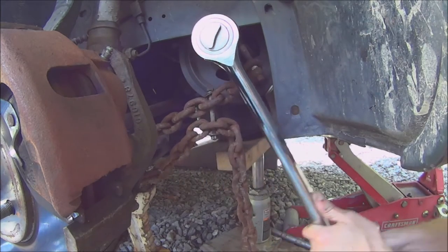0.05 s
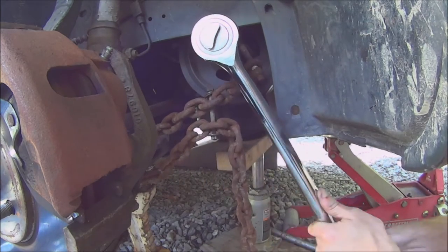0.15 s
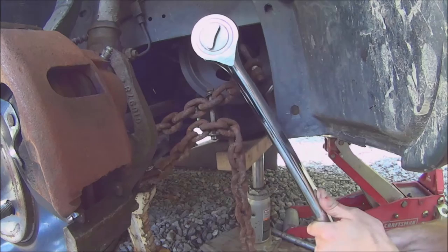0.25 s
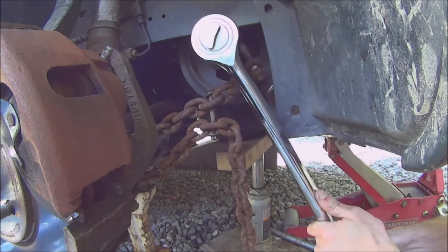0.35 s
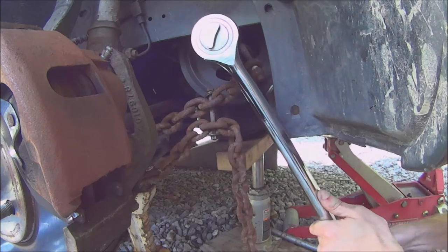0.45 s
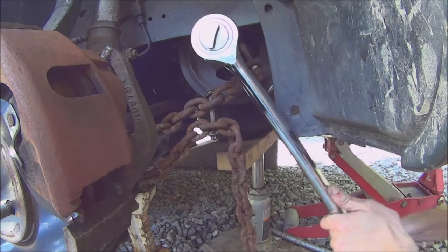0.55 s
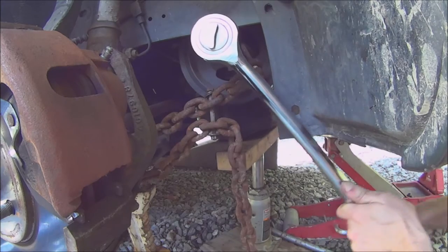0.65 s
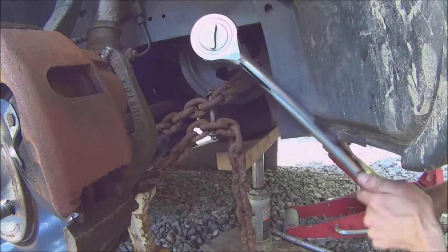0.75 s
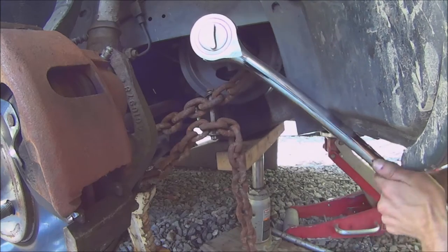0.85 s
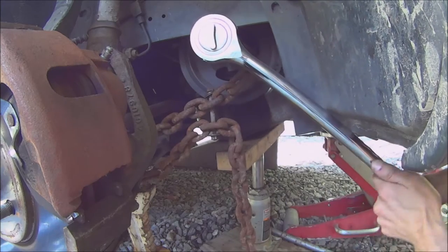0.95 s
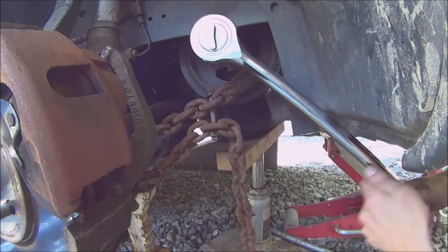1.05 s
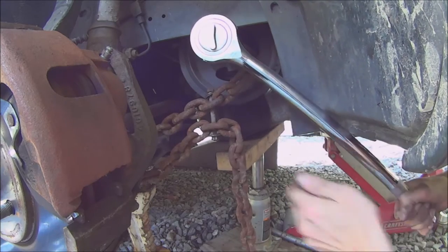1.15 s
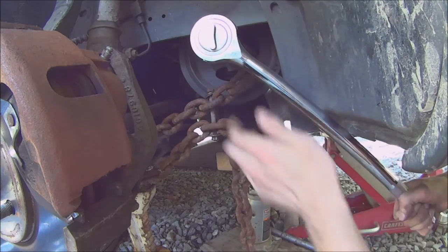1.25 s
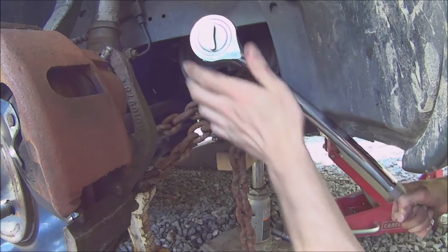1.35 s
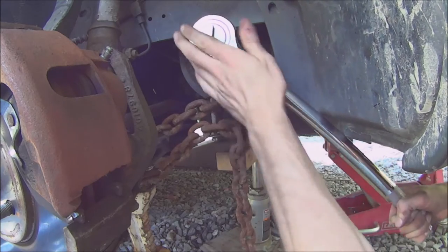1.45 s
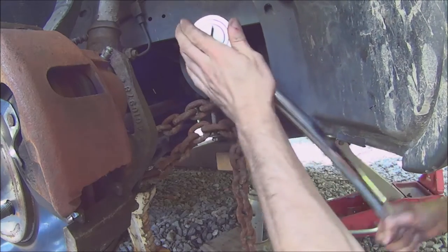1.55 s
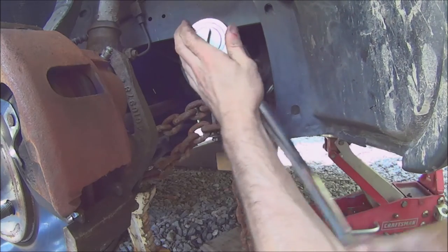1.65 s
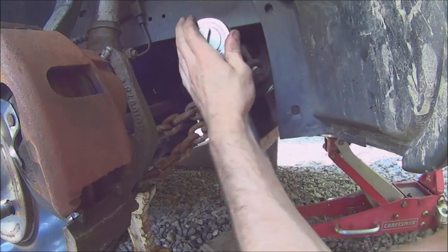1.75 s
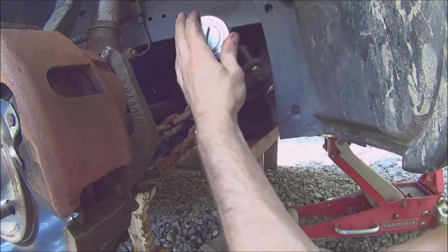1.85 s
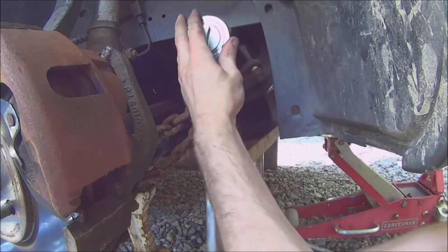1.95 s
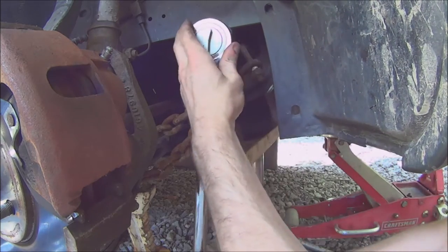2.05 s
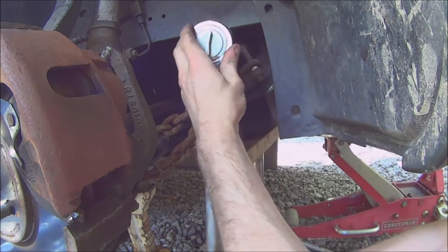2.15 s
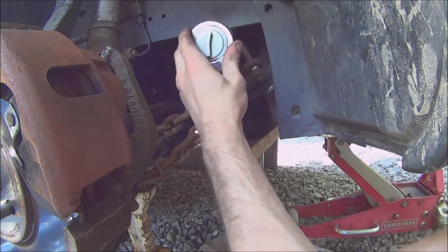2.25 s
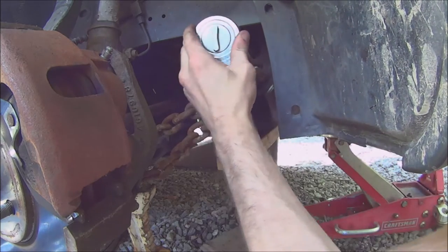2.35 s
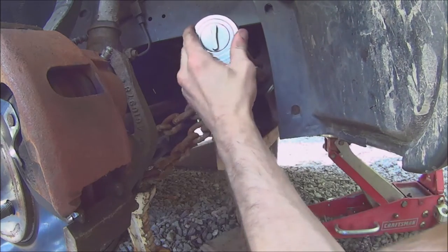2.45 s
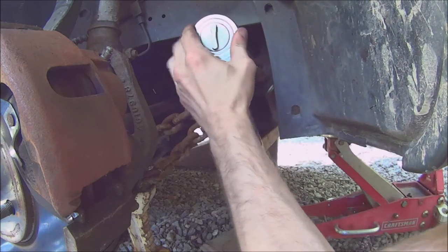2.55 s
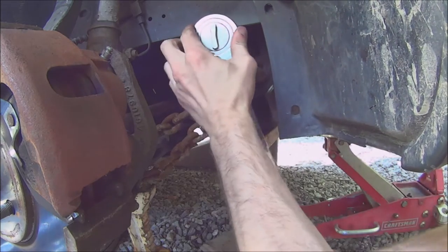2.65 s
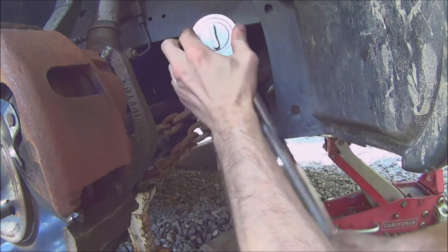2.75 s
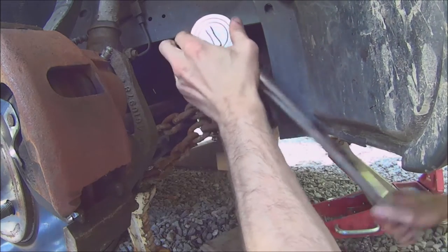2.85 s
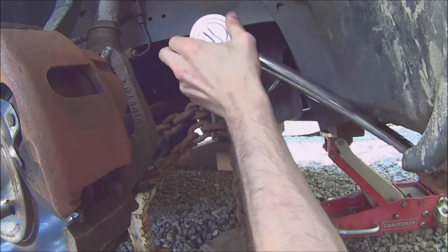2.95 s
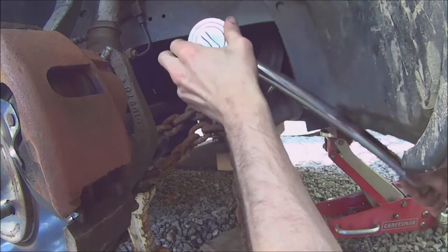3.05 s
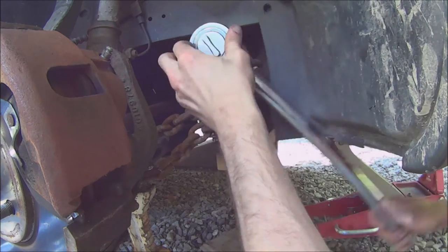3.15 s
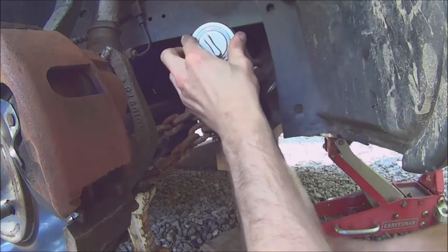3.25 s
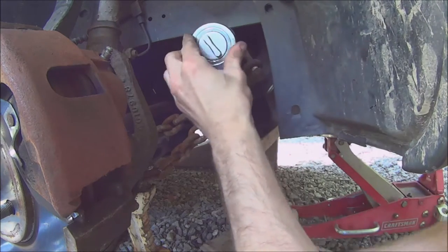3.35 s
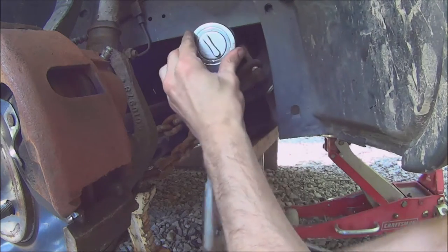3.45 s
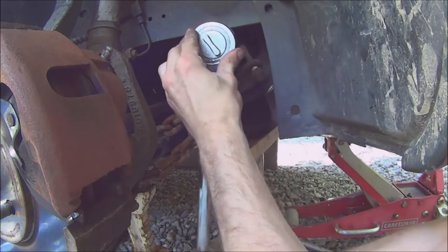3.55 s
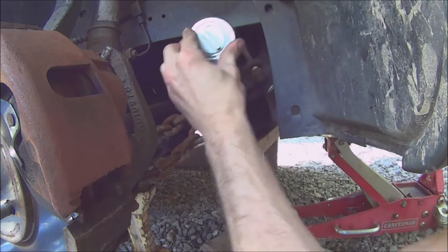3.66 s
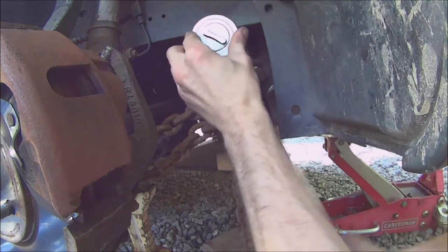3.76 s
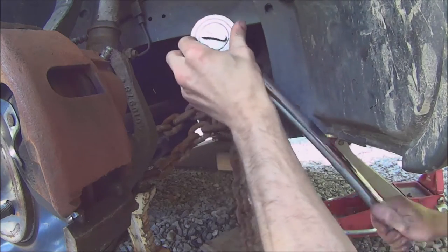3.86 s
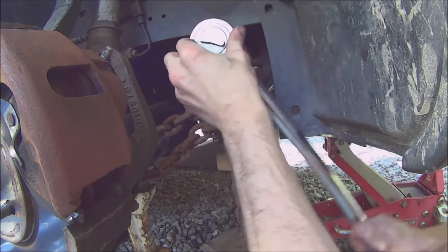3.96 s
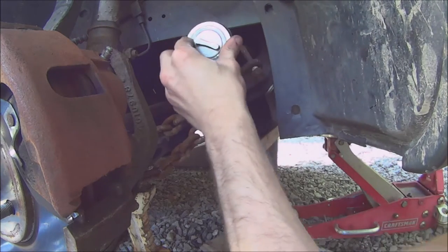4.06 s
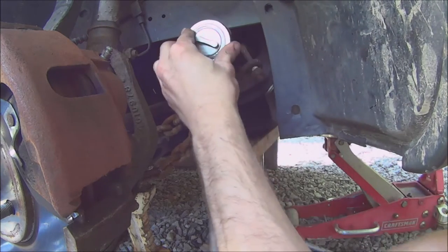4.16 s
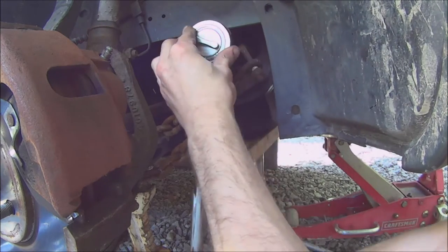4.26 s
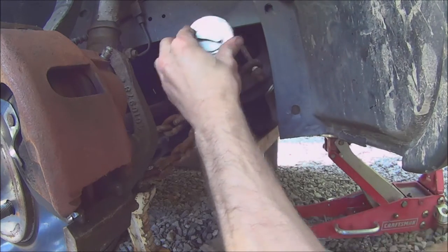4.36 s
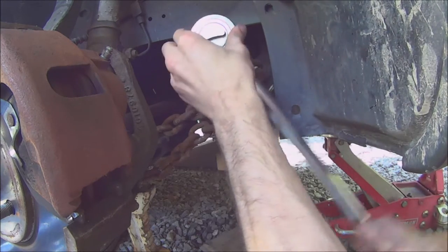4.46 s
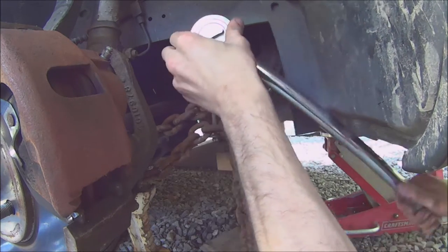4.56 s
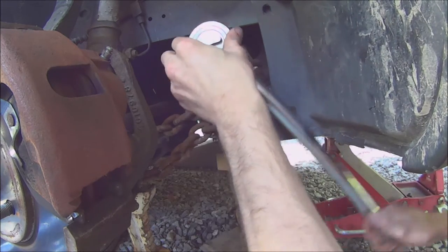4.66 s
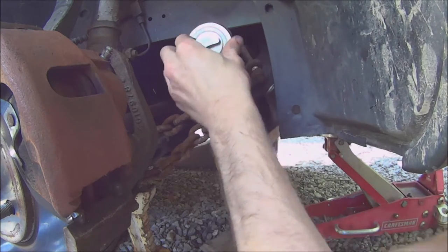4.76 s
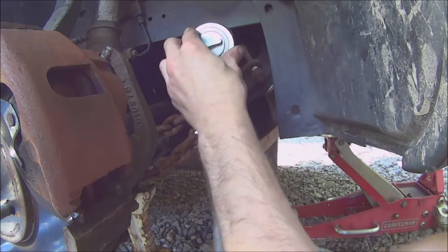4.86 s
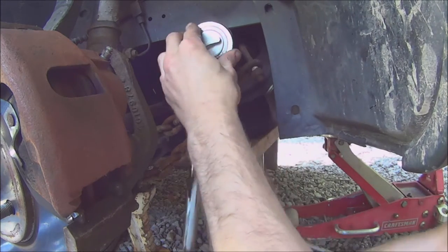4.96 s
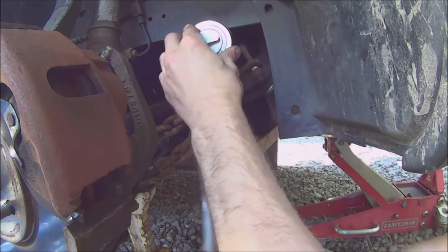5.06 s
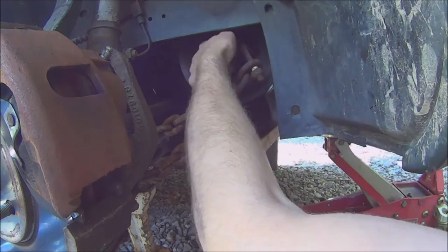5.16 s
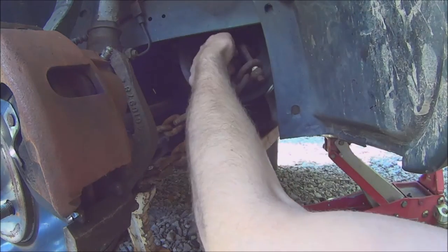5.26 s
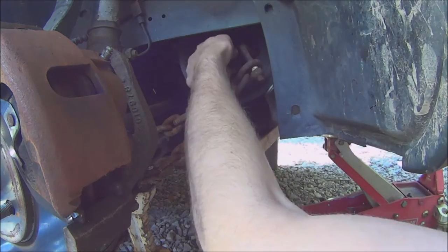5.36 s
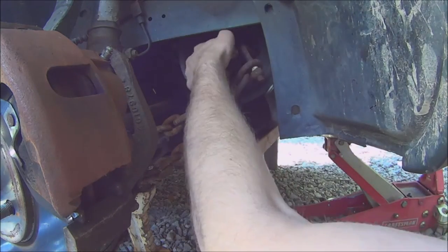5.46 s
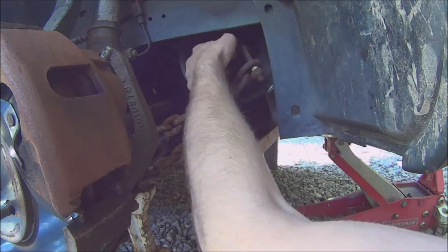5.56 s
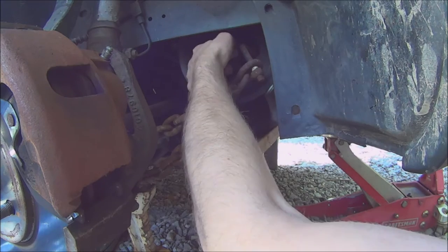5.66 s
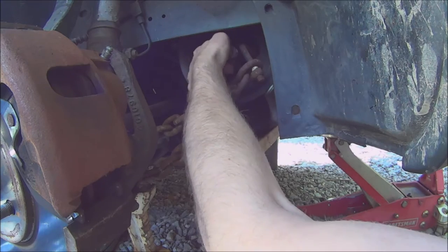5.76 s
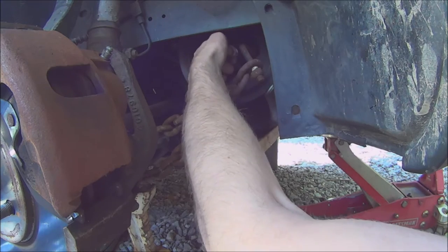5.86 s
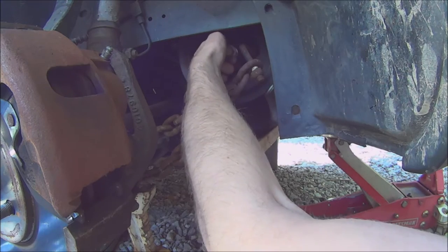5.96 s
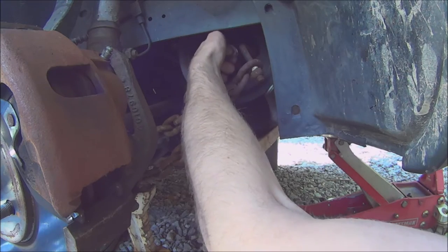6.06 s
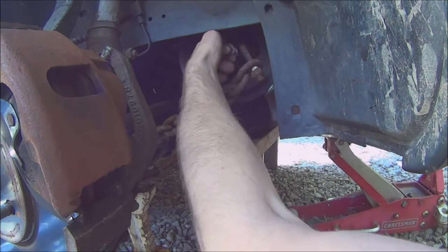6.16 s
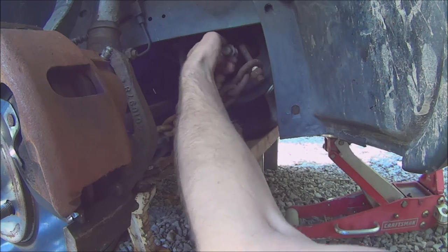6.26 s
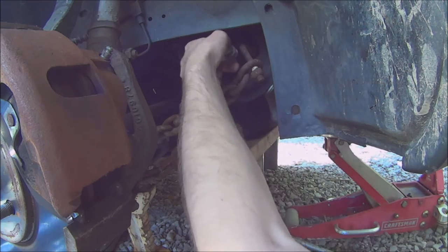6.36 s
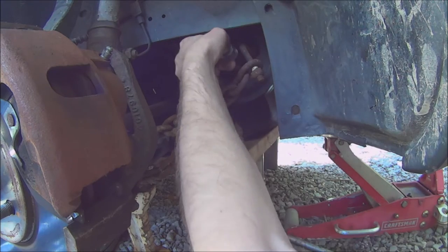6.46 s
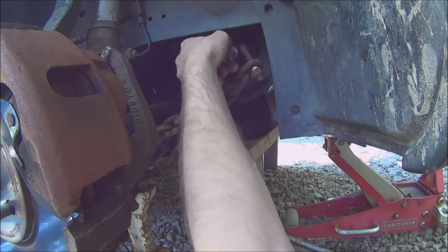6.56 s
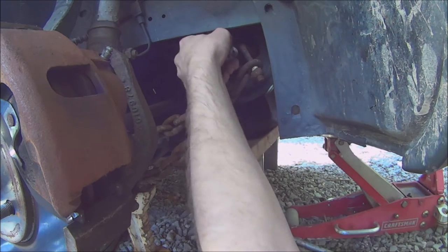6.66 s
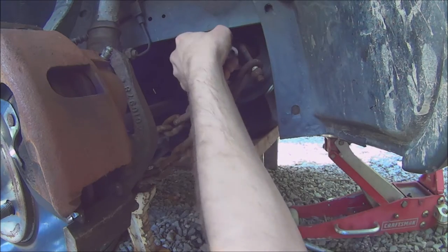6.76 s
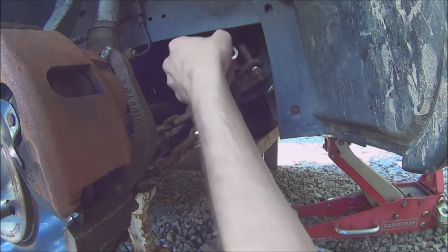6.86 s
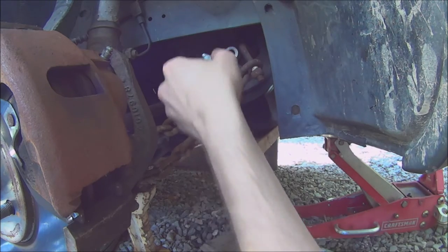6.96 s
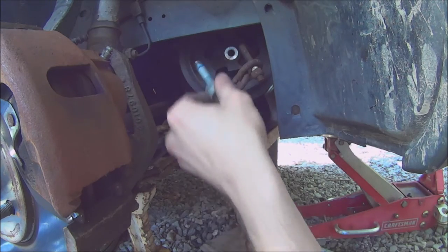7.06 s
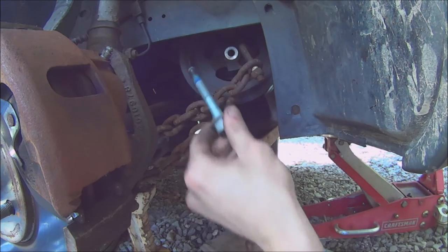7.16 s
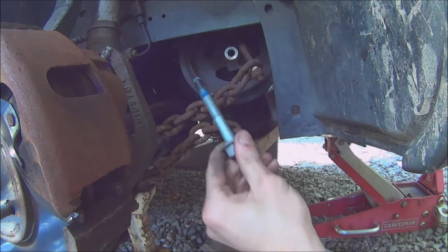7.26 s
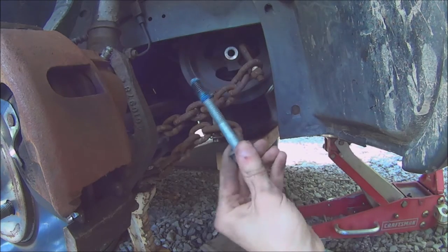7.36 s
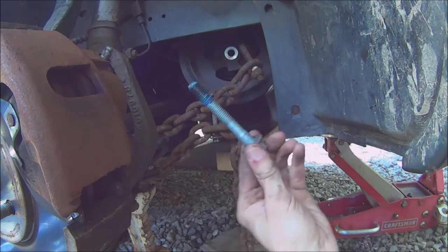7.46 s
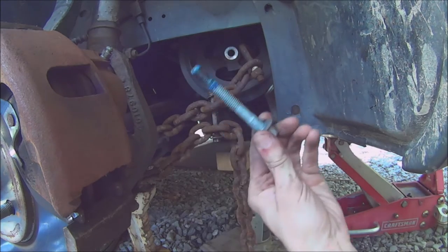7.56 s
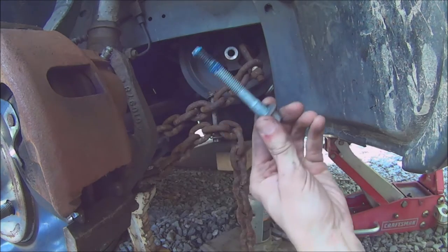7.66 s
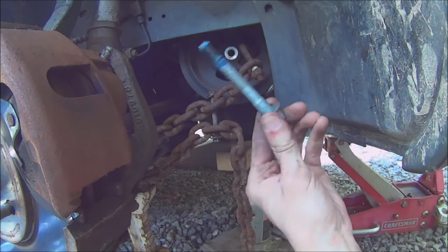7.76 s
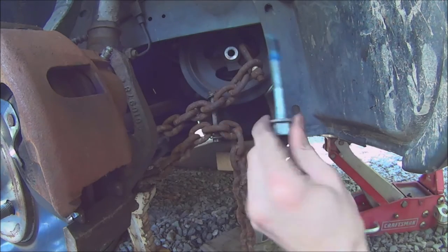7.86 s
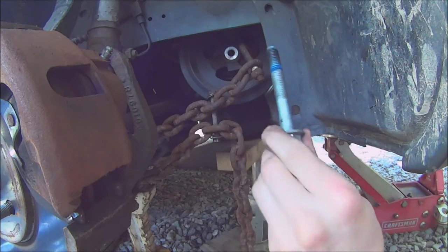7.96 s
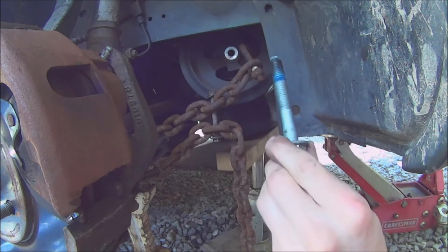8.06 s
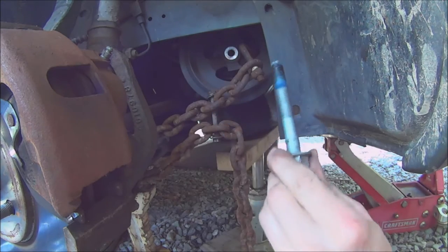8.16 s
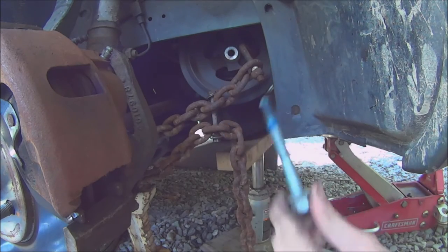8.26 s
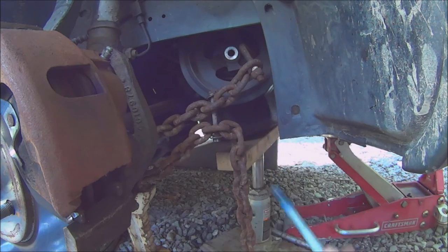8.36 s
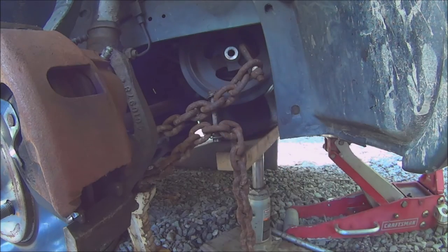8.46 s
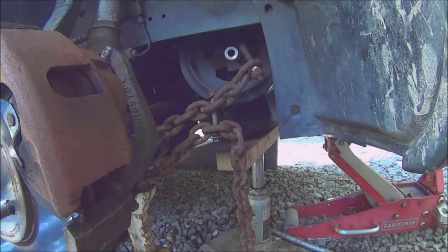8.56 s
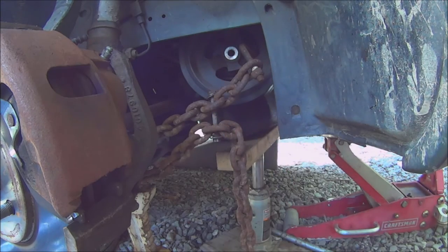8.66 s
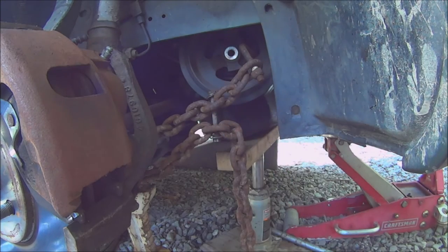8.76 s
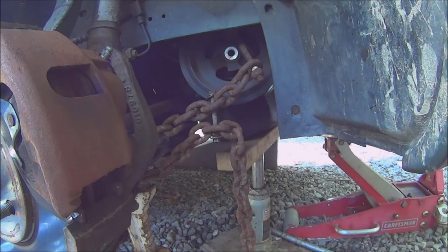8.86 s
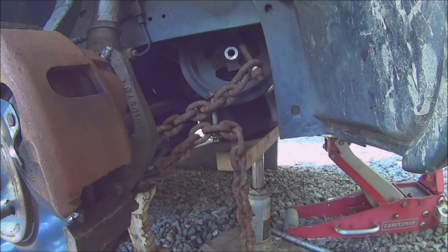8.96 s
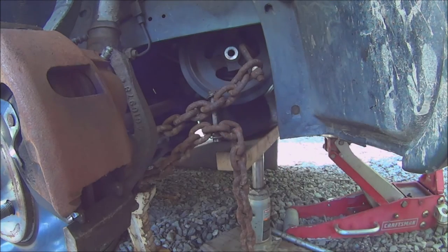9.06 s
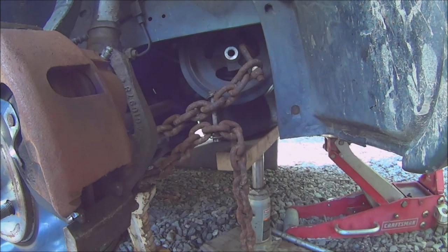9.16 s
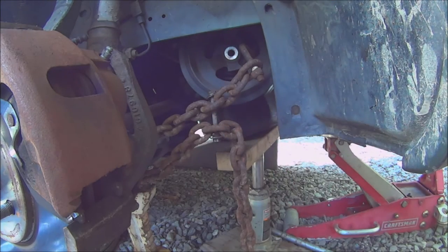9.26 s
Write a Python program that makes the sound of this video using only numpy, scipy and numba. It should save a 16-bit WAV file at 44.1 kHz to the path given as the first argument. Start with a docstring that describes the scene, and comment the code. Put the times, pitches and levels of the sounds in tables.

```python
"""Outdoors, inside a car's wheel well: a big steel ratchet works a bolt loose over a distant motor's hum. The
socket clanks on, the handle clunks under load and thuds the panels, and the pawl clinks from tooth to tooth on
each back swing, over a throbbing hum. Then the scene changes. The long bolt is drawn out by hand, its thread
scraping and its shank ringing, and put aside on gravel while birds whistle in the distance. Near the end the
level dips briefly, and a thin hiss follows."""
import sys
import numpy as np
from scipy import signal
from scipy.fft import rfft, irfft
from scipy.io import wavfile
from scipy.ndimage import uniform_filter1d, minimum_filter1d
from numba import njit

SR = 44100
rng = np.random.default_rng(int(sys.argv[2]) if len(sys.argv) > 2 else 0)


def int16_out(signal):
    """Quantize to a 16-bit WAV file."""
    q = np.round(np.clip(np.atleast_2d(signal).T, -1, 1) * 32767)
    wavfile.write(sys.argv[1], SR, q.astype(np.int16))


N = 410571
TIME = np.arange(N) / SR
HIT = np.arange(SR // 2) / SR  # time since a blow
HUM_END_S, DIP_START_S, DIP_END_S = 5.16, 9.133, 9.165

# Table levels are relative: each layer adds its own trim.
# fader rides for the motor's upper tone, lower tone and noise bed: time_s, level_db
UPPER_HUM_RIDE = [(0, -44), (1.55, -41.5), (1.82, -46), (2.2, -42), (3.05, -39), (3.35, -52), (4.35, -43),
                  (4.65, -42.5), (4.82, -59), (5.05, -39)]
LOWER_HUM_RIDE = [(0, -66), (1.0, -56), (1.65, -62), (2.2, -46), (3.1, -49), (3.45, -57), (3.8, -46),
                  (4.1, -52.5), (5.15, -52.5)]
DRONE_RIDE = [(0, -52.5), (1.9, -50.7), (3.15, -47.5), (3.4, -51), (4.5, -49), (4.8, -53.5), (5.12, -44.5)]
# colour of the motor's noise bed, and its narrow resonances: pitch_hz, level_db
DRONE_EQ = [(15, -65), (25, -8), (43, -7), (64, -2), (81, -4), (110, -7), (152, -11), (187, -16.5),
            (267, -24.5), (362, -17), (480, -20.5), (1300, -26), (2930, -36.5), (3870, -40.5),
            (11000, -49.5), (14300, -80), (22000, -120)]
DRONE_RESONANCES = [(352, -59.5), (760, -67), (1114, -70), (1285, -65)]

# ring of the steel socket, and of the wheel well's hollow panels: pitch_hz, level_db, t60_s
SOCKET_MODES = [(355.4, -7, 0.22), (617, -10.5, 0.23), (1140, -15, .1), (2060, -2, 0.18), (2110, 13, 0.083),
                (2420, -27, 0.32), (2520, -6, 0.14), (3060, -7, 0.17), (3321, -16, 0.11),
                (3530, 8.5, 0.074), (3830, -29, 0.8), (4630, -21, 0.23), (5787, -24, 0.26),
                (7600, 4, 0.068)]
PANEL_MODES = [(106, -5, 0.077), (201.3, -3.5, 0.16), (228, -4, 0.17), (320, -2.5, 0.09), (357.2, 4, 0.12),
               (434.2, -3.5, 0.14), (496, 5.5, 0.04), (614, -2.5, 0.11), (1102, -9, 0.08),
               (1237, -12.5, 0.076)]
# colour of the socket's clank, and of the dry crack of steel on steel: pitch_hz, level_db
CLANK_EQ = [(120, -49), (200, -41), (348, 4), (778, -39), (1090, -12), (1630, -14), (2130, 2), (2780, -10),
            (3580, -10), (11000, -30), (14300, -51), (22000, -120)]
CRACK_EQ = [(300, -38), (1500, -14), (2400, -2), (3100, -11.5), (3900, -1), (4600, -7.5), (5900, -4.5),
            (7000, -2), (9500, -3.5), (11000, -3.5), (15000, -4.5)]

# clunks of the loaded socket and chain: start_s, judder_s, body_db, rattle_db, snap_db
CLUNK_CUES = [(0.021, 0.0019, -22.5, -25.5, -12), (0.75, 0.012, -24.5, -39.5, -16),
              (0.772, 0.0051, -26.5, -40.5, -35), (0.796, 0.0066, -23, -38, -32.5),
              (1.025, 0.007, -33.5, -47, -62), (2.863, 0.016, -20.5, -28.5, -10.5),
              (2.879, 0.0018, -14, -20, -45), (2.887, 0.026, -16.5, -32, -11.5),
              (2.916, 0.0061, -16, -26.5, -29), (3.024, 0.0025, -23, -38.5, -31.5),
              (3.138, .011, -28.5, -42, -55), (3.21, 0.0025, -35.5, -46.5, -40),
              (3.993, 0.0025, -37, -43, -42), (4.342, .003, -38, -42, -46), (4.4993, 0.0031, -21, -33, -16),
              (4.518, .016, -19.5, -25, -32), (4.54, 0.015, -17.5, -42, -19),
              (4.5923, 0.0034, -42, -46, -30.5), (4.618, 0.018, -31.5, -43, -48),
              (4.696, .003, -29.5, -43, -50)]
# colour of a clunk's low body thud, mid rattle and bright snap: pitch_hz, level_db
BODY_EQ = [(29, -35), (55, 1), (105, 2), (210, -10), (335, 2), (668, -3), (849, -23), (1040, -23.5),
           (1200, -28.5), (1560, -40), (2640, -120)]
RATTLE_EQ = [(500, -5), (850, 0.5), (1100, 5), (1400, 0), (1850, -3), (2600, -9), (3600, -7.5), (6000, -27),
             (11000, -30.5)]
SNAP_EQ = [(800, -13), (2500, -5), (4200, 5.5), (6000, 1.5), (8000, -2), (11000, -7), (16000, -7.5)]

# the bolt knocks in its hole: start_s, ring_db, scrape_db
KNOCK_CUES = [(0.4474, -56.5, -76), (6.0706, -59, -48.5), (6.171, -59.5, -67), (6.3794, -43.5, -51),
              (6.3994, -46, -62), (6.6218, -42.5, -51), (6.6588, -47, -53), (6.7493, -42, -53.5)]
# ring of the bolt's shank: pitch_hz, level_db, t60_s
BOLT_MODES = [(619, -35, 0.34), (3880, 2.5, 0.17), (3937, -2, 0.11), (10720, -13, 0.15)]
# the thread drags: start_s, length_s, level_db
SCRAPE_CUES = [(5.71, 0.044, -53.5), (6.103, 0.092, -54.5), (6.348, 0.094, -52.5), (6.481, 0.062, -60.5),
               (6.584, 0.062, -53.5), (6.732, 0.018, -58)]
# colour of the thread's scrape, and of its click as it jumps free: pitch_hz, level_db
THREAD_EQ = [(200, -28.5), (400, 1.5), (600, 10), (850, -12.5), (1400, 3), (2300, -0.5), (3000, -9.5),
             (3900, -9), (5000, -8.5), (9500, -23), (10800, -3.5), (12000, -53)]
CLICK_EQ = [(2500, -18), (5000, 6), (8000, -41), (10800, 27), (12000, 2)]

# clear ticks of the loose socket and pawl: start_s, level_db, treble_db
TICK_CUES = [(1.4295, -42.5, -61), (1.578, -35, -67), (1.616, -38, -74), (1.65, -36, -71),
             (1.6678, -39, -57), (2.1878, -41.5, -59), (2.2172, -40.5, -61), (2.272, -41.5, -80),
             (2.3176, -29.5, -39), (2.329, -32, -56), (3.1044, -39.5, -55), (3.146, -39.5, -64),
             (3.459, -35.5, -36), (3.5663, -35, -31.5), (3.595, -37.5, -57), (3.6364, -28, -23),
             (3.6806, -30, -38), (3.693, -36.5, -58), (3.9827, -26, -57), (4.33, -40, -51),
             (4.372, -38.5, -62), (4.668, -40, -48), (5.074, -36, -44), (5.148, -30.5, -33.5)]
# the socket wobbles in runs of fainter ticks: start_s, length_s, level_db
WOBBLE_CUES = [(1.624, 0.076, -48), (3.154, .04, -44), (4.267, .16, -39.5), (4.983, .16, -43)]
# ring of small loose steel parts, and of the ratchet head: pitch_hz, level_db, t60_s
LOOSE_PART_MODES = [(2495, -16.5, 0.11), (3466, -4.5, 0.1), (3700, -0.5, 0.033), (4560, 4, 0.032),
                    (5820, -1.5, .03), (7110, -12.5, 0.036)]
HEAD_MODES = [(2127, -17.5, 0.26), (2450, -34, 0.15), (3503, -4.5, 0.1), (4426, -9.5, 0.069),
              (4530, -14.5, 0.066), (5180, -2.5, 0.089), (5800, -24, 0.16), (6880, 0, 0.098),
              (6870, 3.5, 0.052), (7016, 1.5, 0.042), (8060, -14.5, 0.073), (8400, -1, 0.071),
              (8868, -17, 0.125), (9300, -30, .12), (10330, -7.5, 0.14), (10980, -15.5, 0.15)]

# the hand slides over the steel: start_s, length_s, level_db
RUB_CUES = [(1.437, 0.059, -56), (2.027, 0.47, -58), (2.38, 0.51, -77), (3.796, 0.38, -57),
            (4.556, 0.38, -51)]
# colour of skin on steel: pitch_hz, level_db
RUB_EQ = [(1500, -25.5), (4000, -1.5), (6500, 0.5), (9000, -18), (11000, -6.5)]

# pawl snaps in four back swings: start_s, ring_db, tilt_db_per_octave, crack_db
PAWL_CUES = [(1.7118, -49.5, -12.5, -28.5), (1.7808, -41, -2.5, -30), (1.852, -39, 12.5, -32.5),
             (1.9423, -35.5, 1, -34), (3.2221, -31, -2, -34), (3.2616, -29.5, 3.5, -32.5),
             (3.3061, -31.5, 3.5, -32.5), (3.3505, -30.5, 0.5, -29.5), (3.3993, -35, 3, -32.5),
             (3.474, -40, 1.5, -34), (3.9995, -47, -5, -31), (4.052, -35, -1, -29),
             (4.0905, -38.5, -2, -42), (4.131, -38, 1, -37), (4.1789, -29.5, 10.5, -37),
             (4.7212, -32, 3.5, -32.5), (4.7594, -28.5, 9.5, -35), (4.795, -37, 5.5, -36.5),
             (4.836, -38, 5, -35), (4.8803, -35.5, 2, -35)]

# fader ride for the outdoor air: time_s, level_db
AIR_RIDE = [(5.22, -68), (6.65, -65.5), (7.0, -67), (7.9, -69), (8.4, -67.5), (8.75, -62.5), (9.3, -66)]
# colour of the air: pitch_hz, level_db
AIR_EQ = [(15, -47), (25, -17), (38, -20), (59, 7.5), (118, -6), (152, 3.5), (178, -5), (353, -7),
          (1030, -14), (1670, -15.5), (1850, -14), (4630, -19.5), (5530, -21.5), (11000, -24), (14300, -70),
          (22000, -120)]

# bird calls, one curved glide each: start_s, length_s, start_hz, middle_hz, end_hz, level_db
BIRD_CUES = [(5.229, 0.05, 3130, 3320, 3320, -64.5), (5.442, 0.11, 5530, 5870, 5170, -55.5),
             (6.233, 0.093, 4020, 4980, 4650, -52), (6.328, 0.1, 2970, 3580, 3690, -54),
             (6.946, 0.11, 1665, 1700, 1650, -67), (7.344, 0.096, 3820, 3885, 4150, -55.5),
             (7.401, 0.13, 4230, 5750, 5060, -57), (7.503, 0.084, 3550, 3950, 3410, -55.5),
             (8.045, .115, 2840, 2760, 1926, -55), (8.2, 0.13, 2810, 2634, 2266, -56.5),
             (8.638, 0.046, 5470, 5690, 5650, -60), (8.686, 0.055, 4700, 4130, 3580, -57.5)]
# colour of a faint wash of more distant birds: pitch_hz, level_db
CHORUS_EQ = [(1500, -45), (2100, -1), (2450, 0), (3000, -8), (4200, -45)]

# shuffles on the gravel: start_s, length_s, stones_db, grit_db
SHUFFLE_CUES = [(8.524, 0.15, -53.5, -70), (8.67, 0.57, -66.5, -63)]
# colour of the stones, and of the fine grit: pitch_hz, level_db
STONES_EQ = [(200, -5), (450, -5), (750, 0), (1100, -2.5), (2200, 2), (2700, -15), (9000, -28)]
GRIT_EQ = [(1000, -10), (3000, 3), (4200, 3.5), (6000, -4), (11000, -33)]
# soft bump of the bolt being put down: pitch_hz, level_db, t60_s
BUMP_MODES = [(185, -5.5, 0.07), (237, -1, 0.077), (294, -8, .05), (750, -13.0, 0.051)]

# colour of the closing hiss: pitch_hz, level_db
HISS_EQ = [(120, -3), (260, 17), (700, 7.5), (1400, 11), (3000, -3), (8000, 3.5), (10500, 1), (12500, 4),
           (15500, -4)]


def undb(db):
    """Decibels to gain."""
    return 10 ** (np.asarray(db) / 20)


def unit(x):
    """Scale to rms 1."""
    return x / np.sqrt(np.mean(x ** 2))


def ride(points):
    """A fader move in dB: straight lines between the points."""
    return np.interp(TIME, *np.transpose(points))


def add(track, start_s, sound, pan_db=0):
    """Mix a sound into a stereo track; a negative pan leans right."""
    i = max(int(start_s * SR), 0)
    pan = undb(np.array([[pan_db], [-pan_db]]) / 2)
    track[:, i:i + sound.shape[-1]] += (sound * pan)[:, :N - i]


def noise(eq, size, width):
    """Stereo noise coloured by an EQ curve; width sets how much the ears differ."""
    hz, db = np.transpose(eq)
    f = np.maximum(np.fft.rfftfreq(size, 1 / SR), 1)
    gain = undb(np.interp(np.log(f), np.log(hz), db)) / np.sqrt(1 + (hz[0] / 2 / f) ** 4)
    apart = f / (f + 150)  # long waves reach both ears alike
    mid, side = irfft(rfft(rng.standard_normal((2, size))) * [gain, gain * apart], size)
    return unit(np.array([mid + width * side, mid - width * side]))


def fade(t60):
    """Exponential decay after a blow, 60 dB down in t60 seconds."""
    return np.exp(-np.log(1000) * HIT / max(t60, 1e-3))


def burst(eq, t60, tail_db, tail_t60, width):
    """A noise hit standing for crowded short modes, with a tail for the wheel well's reflections."""
    return noise(eq, len(HIT), width) * (fade(t60) + undb(tail_db) * fade(tail_t60))


def ring(modes, gain_db, detune, spread, vary_db=2):
    """Decaying modes; each blow weights them anew, and each reaches the two ears differently."""
    hz, db, t60 = np.transpose(modes)
    weight, shift, lag, lean = rng.standard_normal((4, len(hz)))
    poles = 2j * np.pi * hz * (1 + detune * shift) / SR - np.log(1000) / t60 / SR
    strike = undb(db + gain_db + vary_db * weight) * np.exp(2j * np.pi * rng.random(len(hz)))
    ears = np.exp(np.array([[1], [-1]]) * spread * (1j * lag + lean / 2))
    return ((strike * ears) @ np.exp(np.outer(poles, np.arange(len(HIT))))).imag


def drift(rate_hz):
    """Smooth random movement with rms 1."""
    hold = max(int(SR / rate_hz), 2)
    steps = np.repeat(rng.standard_normal(N // hold + 1), hold)
    return unit(uniform_filter1d(uniform_filter1d(steps, hold), hold)[:N])


def grainy(eq, width, depth_db, rate_hz):
    """Friction texture: coloured noise whose level flutters at random."""
    return noise(eq, N, width) * unit(undb(depth_db * drift(rate_hz)))


def swell(start_s, length_s):
    """Rounded envelope of one short stroke."""
    return np.sin(np.pi * np.clip((TIME - start_s) / length_s, 0, 1)).clip(0) ** .5


def motor_tone(hz, levels, octave_db, wander=0.0038):
    """A slightly wandering low tone with a weak octave."""
    phase = 2 * np.pi * np.cumsum(hz * (1 + wander * drift(6))) / SR
    level = np.sqrt(2) * undb(ride(levels) + 0.7 * drift(17))
    return level * (np.sin(phase) + undb(octave_db) * np.sin(2 * phase))


def motor():
    """Two close low tones throb as they beat, in a bed of broad noise with a few narrow resonances."""
    out = np.zeros((2, N))
    upper = motor_tone(hz=79.6, levels=UPPER_HUM_RIDE, octave_db=-14.5)
    lower = motor_tone(hz=71.4, levels=LOWER_HUM_RIDE, octave_db=-13)
    low_cut = signal.butter(1, 170, "high", fs=SR, output="sos")  # leaves room for the hum
    bed = unit(signal.sosfilt(low_cut, noise(DRONE_EQ, N, width=0.75)))
    drone = bed * undb(ride(DRONE_RIDE) + 5.5 + .8 * drift(9))
    for hz, db in DRONE_RESONANCES:
        flutter = drift(70) + 1j * drift(70)
        drone += undb(db) * (flutter * np.exp(2j * np.pi * hz * TIME)).real
    add(out, 0, upper + lower + drone, pan_db=-1.2)
    return out


def socket_clank():
    """The socket seats on the bolt head with one bright clank that also shakes the panels."""
    out = np.zeros((2, N))
    clank = undb(-16) * burst(CLANK_EQ, t60=0.11, tail_db=-12.5, tail_t60=0.27, width=0.47)
    edge = undb(-13) * burst(CRACK_EQ, t60=0.068, tail_db=-12, tail_t60=0.084, width=0.19)
    steel = ring(SOCKET_MODES, gain_db=-22, detune=0.00074, spread=0.33, vary_db=1)
    panels = ring(PANEL_MODES, gain_db=-41, detune=0.01, spread=0.26)
    add(out, .009, clank + edge + steel + panels, pan_db=-2.5)
    return out


def load_clunks(slips=4, gap_s=.0095, scatter=.25):
    """The thread sticks and slips under load: each jerk snaps steel, rattles the chain, thuds panels."""
    out = np.zeros((2, N))
    for start_s, judder_s, body_db, rattle_db, snap_db in CLUNK_CUES:
        gaps = gap_s * np.exp(scatter * rng.standard_normal(slips))
        panels = ring(PANEL_MODES, gain_db=-8, detune=0.012, spread=0.5)
        for delay_s in np.cumsum(gaps) - gaps[0]:
            is_repeat = delay_s > 0
            force = np.exp(-(delay_s / judder_s) ** 2 / 2) * undb(0.5 * is_repeat)
            body = burst(BODY_EQ, t60=0.063, tail_db=-18.5, tail_t60=0.22, width=0.77)
            thud = undb(body_db + 2.5) * (body + panels) * (1 - fade(0.015))
            rattle = burst(RATTLE_EQ, t60=0.079, tail_db=-10.5, tail_t60=0.094, width=0.22)
            snap = burst(SNAP_EQ, t60=0.0044, tail_db=-14, tail_t60=0.055, width=0.56)
            snap *= undb(snap_db + 3 - 20 * is_repeat)  # later slips snap far less
            add(out, start_s + delay_s, force * (thud + snap), pan_db=-1.5)
            add(out, start_s + delay_s, force * undb(rattle_db + 4.5) * rattle, pan_db=-3.5)
    return out


def bolt():
    """The shank rings at each knock; the thread clicks free and catches in grains as it slides out."""
    out = np.zeros((2, N))
    for start_s, ring_db, scrape_db in KNOCK_CUES:
        add(out, start_s, ring(BOLT_MODES, ring_db + 1.5, detune=0.0021, spread=0.19), pan_db=-0.5)
        scuff = burst(THREAD_EQ, t60=0.02, tail_db=0.5, tail_t60=0.25, width=0.36)
        add(out, start_s, undb(scrape_db - 2.5) * scuff, pan_db=-1)
    click = burst(CLICK_EQ, t60=.035, tail_db=-26, tail_t60=.1, width=0.19)
    add(out, 6.071, undb(-37) * click, pan_db=-2)
    grains = grainy(THREAD_EQ, width=0.31, depth_db=2.3, rate_hz=350)
    strokes = sum(undb(db) * swell(start_s, length_s) for start_s, length_s, db in SCRAPE_CUES)
    add(out, 0, grains * strokes, pan_db=-1.5)
    return out


def tick(db, treble_db):
    """One small steel tap, damped by the grip; loose parts shift pitch with the point of contact."""
    eq = [(hz, band_db + np.interp(hz, [5000, 8000], [db, treble_db + 2])) for hz, band_db in CRACK_EQ]
    tap = burst(eq, t60=0.0079, tail_db=-5.5, tail_t60=0.073, width=0.45)
    parts = ring(LOOSE_PART_MODES, db - 5, detune=0.0745, spread=0.27)
    head = ring(HEAD_MODES, treble_db - 26, detune=0.0019, spread=0.23)
    return undb(max(db, treble_db) + 3.5) * tap + parts + head


def socket_ticks(per_wobble=4, vary_db=3, pan_db=-1.9):
    """Play in the socket: single taps, and a few uneven faint ones in each wobble."""
    out = np.zeros((2, N))
    for start_s, db, treble_db in TICK_CUES:
        add(out, start_s, tick(db, treble_db), pan_db)
    for start_s, length_s, db in WOBBLE_CUES:
        for k in range(per_wobble):
            tick_db = db + vary_db * rng.standard_normal()
            tick_s = start_s + length_s * (k + rng.random()) / per_wobble
            add(out, tick_s, tick(tick_db, treble_db=tick_db - 12), pan_db)
    return out


def hand_rub():
    """Skin slides over the ratchet with a soft, grainy hiss."""
    strokes = sum(undb(db) * swell(start_s, length_s) for start_s, length_s, db in RUB_CUES)
    return grainy(RUB_EQ, width=.4, depth_db=1.5, rate_hz=90) * strokes


def pawl_clinks(pivot_hz=6400, pan_db=-1):
    """The pawl slips off a tooth with a tick, snaps into the next one, rings the head and chatters."""
    out = np.zeros((2, N))
    octaves = np.log2(np.array(HEAD_MODES)[:, 0] / pivot_hz)
    next_starts = [cue[0] for cue in PAWL_CUES[1:]] + [TIME[-1]]
    for (start_s, ring_db, tilt, crack_db), next_s in zip(PAWL_CUES, next_starts):
        head = ring(HEAD_MODES, ring_db + 11.5 + tilt * octaves, detune=0.0017, spread=0.34, vary_db=5)
        head *= 1 - fade(0.013)  # reflections in the wheel well build the ring up
        head *= np.exp(-np.maximum(HIT - (next_s - start_s), 0) / .006)  # the next snap chokes it
        crack = undb(crack_db + 3) * burst(CRACK_EQ, t60=0.057, tail_db=-6, tail_t60=0.18, width=0.51)
        parts = ring(LOOSE_PART_MODES, crack_db + 4, detune=0.057, spread=0.26)
        add(out, start_s, head + crack + parts, pan_db)
        slip = burst(CRACK_EQ, t60=0.048, tail_db=-8.5, tail_t60=0.036, width=.3)
        add(out, start_s - .0045, undb(crack_db - 0.5) * slip, pan_db)
        chatter_s = start_s + rng.uniform(0.0065, 0.027)
        chatter = burst(CRACK_EQ, t60=0.011, tail_db=-26.5, tail_t60=.04, width=0.37)
        add(out, chatter_s, undb(crack_db - 2) * chatter, pan_db)
    return out


def air():
    """A quiet, wide outdoor rush that steps down after the dip."""
    out = np.zeros((2, N))
    level_db = ride(AIR_RIDE) + 7 + .5 * drift(6) - 9 * (TIME > DIP_END_S)
    add(out, 0, noise(AIR_EQ, N, width=0.94) * undb(level_db), pan_db=-0.5)
    return out


def birds(warble_depth=.038):
    """Warbling whistles from far off, smeared by echoes from trees and walls, with a faint chorus."""
    song, warble = np.zeros((2, N)), drift(450)
    for start_s, length_s, start_hz, middle_hz, end_hz, db in BIRD_CUES:
        progress = np.linspace(0, 1, int(length_s * SR))
        glide = np.polyval(np.polyfit([0, .5, 1], [start_hz, middle_hz, end_hz], 2), progress)
        hz = glide * (1 + warble_depth * warble[int(start_s * SR):][:len(progress)])
        envelope = undb(db) * np.sin(np.pi * progress).clip(0) ** .5
        add(song, start_s, envelope * np.sin(2 * np.pi * np.cumsum(hz) / SR), pan_db=-2)
    echoes = rng.standard_normal((2, len(HIT))) * fade(0.6)
    reverb = signal.fftconvolve(song, echoes / np.linalg.norm(echoes[0]), axes=1)[:, :N]
    chorus = undb(-67) * noise(CHORUS_EQ, N, width=.7) * swell(start_s=5.85, length_s=0.48)
    return chorus + undb(2) * song + undb(4.5) * reverb


def gravel():
    """The bolt is put aside with a soft bump; stones shift and fine grit rustles."""
    out = np.zeros((2, N))
    stones = grainy(STONES_EQ, width=0.5, depth_db=2.3, rate_hz=250)
    grit = grainy(GRIT_EQ, width=0.55, depth_db=1.7, rate_hz=100)
    for start_s, length_s, stones_db, grit_db in SHUFFLE_CUES:
        crunch = undb(stones_db) * stones + undb(grit_db) * grit
        add(out, 0, crunch * swell(start_s, length_s), pan_db=-11.5)
    add(out, 8.533, ring(BUMP_MODES, gain_db=-37.5, detune=0.0091, spread=0.13), pan_db=-1)
    return out


def hiss():
    """A thin, steady hiss that comes in after the dip."""
    return undb(-58) * noise(HISS_EQ, N, width=0.68) * (TIME > DIP_END_S)


def scene(edge_hz=11080, dip_db=-26):
    """The scene changes at once from ratchet work and hum to quiet handling outdoors; the level dips briefly
    near the end."""
    working = TIME < HUM_END_S
    blows = (socket_ticks() + load_clunks()) * working
    outdoors = air()
    work = pawl_clinks() + socket_clank() + hand_rub() + motor()
    mix = np.where(working, work, outdoors) + blows + bolt() + gravel() + birds()
    # the treble ends in a steep edge; a gate lets only the sharpest blows bite above it
    dull = signal.sosfilt(signal.ellip(10, .3, 60, edge_hz, fs=SR, output="sos"), mix)
    bite = signal.sosfilt(signal.butter(6, edge_hz, "high", fs=SR, output="sos"), blows)
    gate = np.minimum(uniform_filter1d(np.abs(bite), size=128) / undb(-38), 1) ** 3
    dip = uniform_filter1d(1. * ((TIME > DIP_START_S) & (TIME < DIP_END_S)), size=128)
    return (dull + undb(-23) * bite * gate + hiss()) * undb(dip_db * dip)


@njit
def follow(x, attack, release):
    """Envelope follower with separate rise and fall rates per sample."""
    out, envelope = np.empty(len(x)), 0.
    for i in range(len(x)):
        envelope += (x[i] - envelope) * (attack if x[i] > envelope else release)
        out[i] = envelope
    return out


def record(dry, threshold_db=-12.3, attack_s=.0006, release_s=.012, top_hz=16000):
    """A limiter with a short look-ahead flattens the loudest blows; the top is cut steeply."""
    peaks = -minimum_filter1d(-np.abs(dry).max(axis=0), size=64)
    envelope = follow(peaks, 1 / (attack_s * SR), 1 / (release_s * SR))
    limited = dry / np.maximum(envelope / undb(threshold_db), 1)
    return signal.sosfilt(signal.ellip(8, .3, 70, top_hz, fs=SR, output="sos"), limited)


dry = scene()
out = record(dry)
int16_out(out)
```